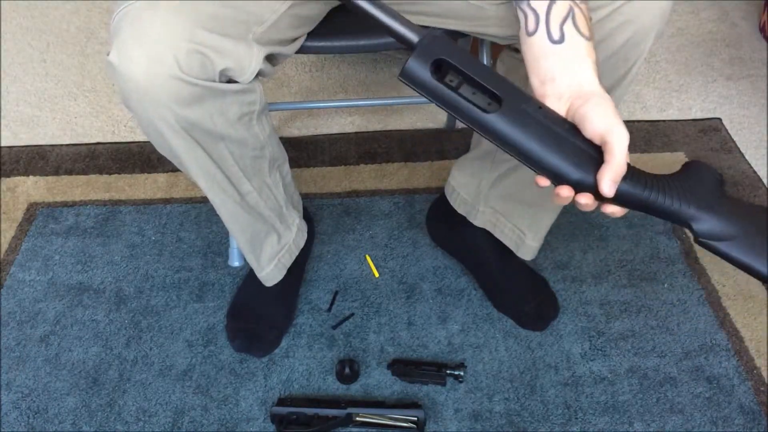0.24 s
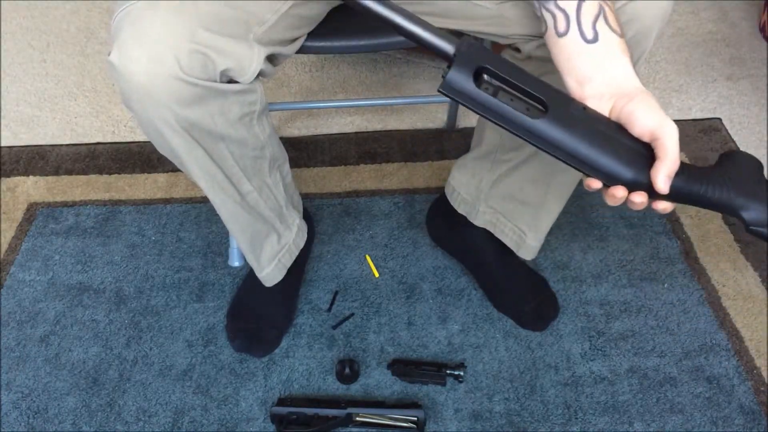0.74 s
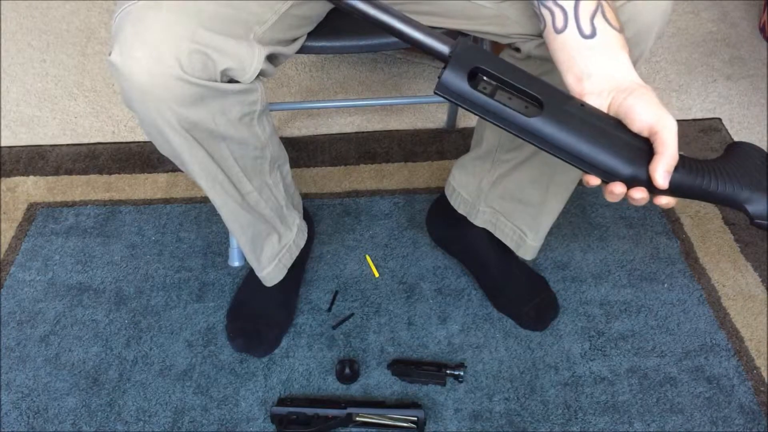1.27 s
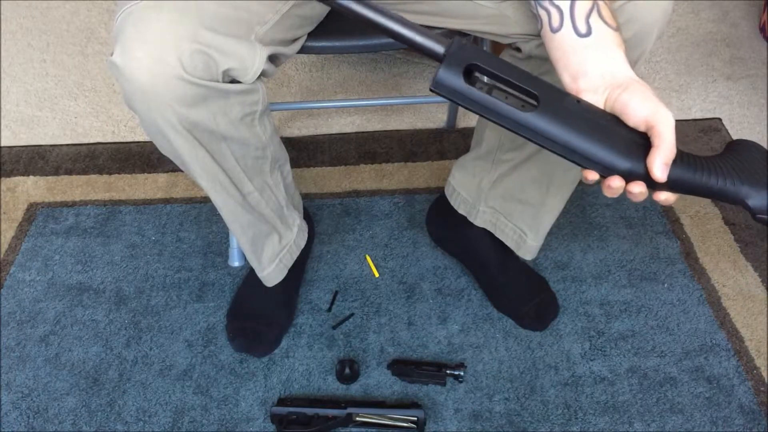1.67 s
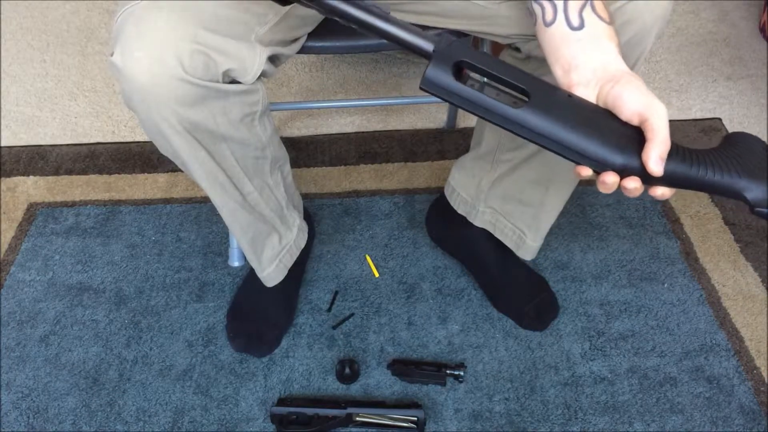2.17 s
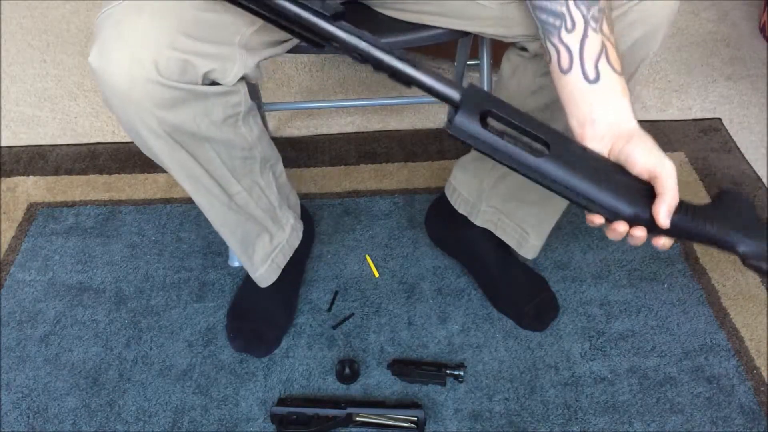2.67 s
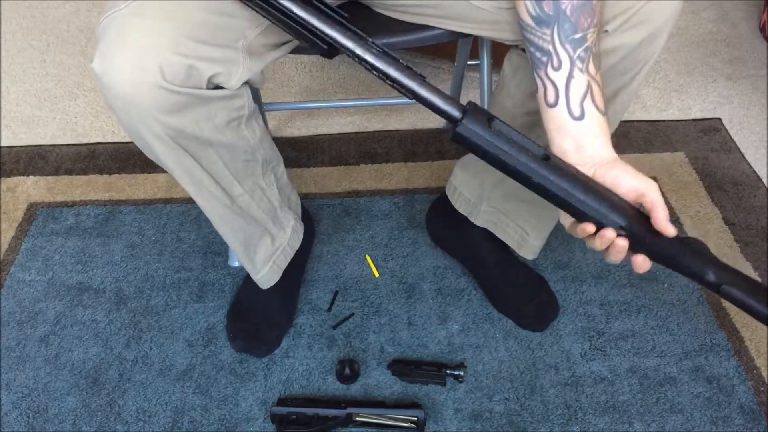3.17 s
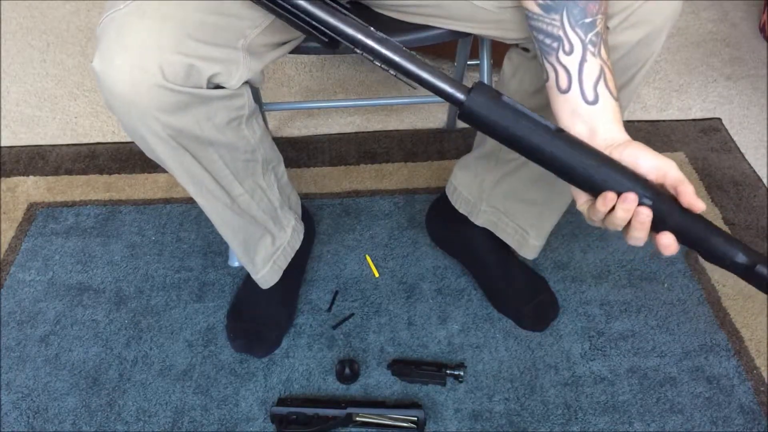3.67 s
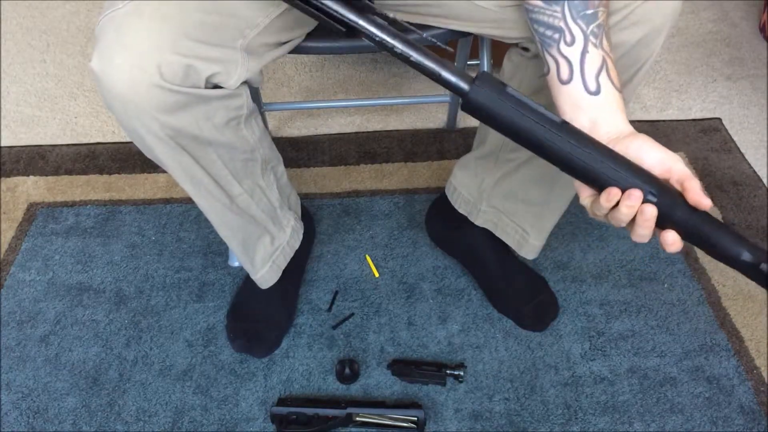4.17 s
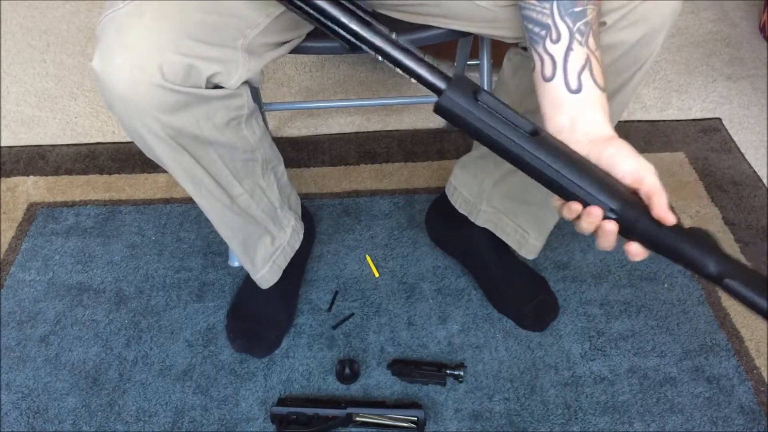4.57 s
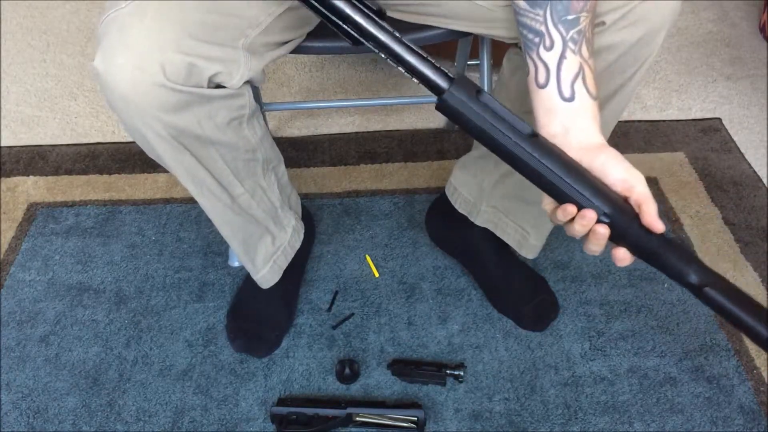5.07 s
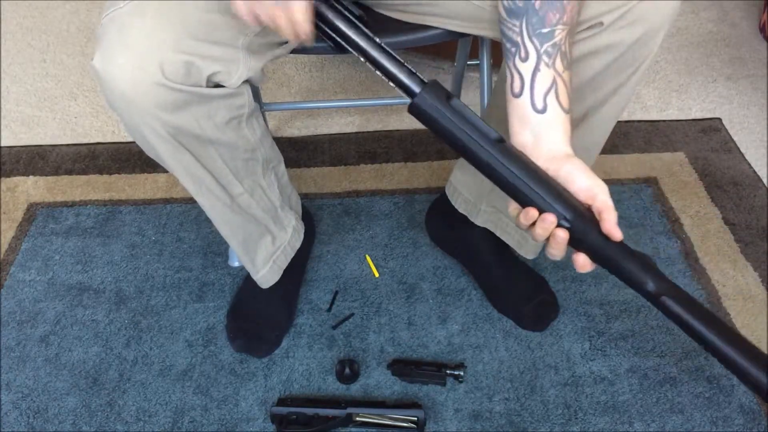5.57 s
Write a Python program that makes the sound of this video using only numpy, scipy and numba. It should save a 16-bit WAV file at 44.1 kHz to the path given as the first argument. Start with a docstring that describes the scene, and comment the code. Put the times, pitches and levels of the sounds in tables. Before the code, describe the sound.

Parts of a pump shotgun are slid together in the hands of a seated person, close to a phone microphone in a small carpeted room. From 0 to 0.45 s loose parts rub and tick, ending in a bright sharp clack. At 0.65-1.07 s a thin, ringing metal scrape comes with clicks, then a pause. From 1.6 to 2.15 s two rougher strokes grate with knocks and dull stock thuds. After another pause, a quick slide and cluster of clacks sounds at 2.55-2.8 s. Lighter ticks and faint rubs follow around 2.9, 3.3, 3.5 and 3.7 s. A soft slide at 3.9 s leads to a loud, hard clack at 4.2 s; another heavy double clack lands at 4.75 s, with rattles until 5 s. Smaller taps follow at 5.2-5.4 s, and a soft scrape with ticks at 5.65-5.8 s. Short room tail, quiet hiss and wavering low hum throughout.

```python
"""Steel scrapes, knocks and rattles: parts of a pump shotgun slid together in the hands of someone seated. Bars
scrape in their grooves as uneven noise bursts with two moving pitches; knocks are ticks with dying rattles and
short notes; this contact noise drives damped modes of barrel, receiver and stock. A small carpeted room answers
with a diffuse tail, over quiet hiss, wavering household hum and low rumbles of handling. The microphone is that
of a phone a step away."""
import sys
import numpy as np
from scipy import signal
from scipy.fft import rfft, irfft
from scipy.io import wavfile
from scipy.ndimage import uniform_filter1d
from numba import njit

SR = 44100
rng = np.random.default_rng(int(sys.argv[2]) if len(sys.argv) > 2 else 0)


def transcribe(u):
    """Save the signal u as a 16-bit wav file named by the first command-line argument.

    u: samples, shape (n,) or (channels, n), limited to [-1, 1]; the rate is SR.
    q: integer samples, one column per channel.
    """
    v = np.clip(np.atleast_2d(u).T, -1, 1)
    q = np.round(v * 32767).astype(np.int16)
    wavfile.write(sys.argv[1], SR, q)


def nominal_scale(level):
    """Amplitude ratio for a level in decibels (scalar or array-like)."""
    x = np.asarray(level, float) / 20
    return 10 ** x


N = 257098

# frequency ranges of thud, clack, ring and sizzle: (low edge [Hz], high edge [Hz])
CONTACT_BANDS = [(300, 850), (850, 2950), (2950, 9000), (9000, 16400)]
# hiss and rumble of house and microphone: (frequency [Hz], relative density [dB])
HOUSE_SPECTRUM = [(15, -37.5), (25, -17.5), (82, -4), (170, -16), (206, -11.5), (229, -7.5), (335, -15.5),
                  (560, -18), (734, -29), (818, -22), (1480, -24), (2220, -21), (2840, -25), (12900, -32.5),
                  (16000, -37)]
# narrow household hum: (centre [Hz], width [Hz], level at rest [dB])
HUM_BANDS = [(122, 17, -80.5), (175, 49, -80), (228.8, 28, -78.5)]
# low rumbles from handling the gun, swelling in the hum bands: (time [s], then added level at the peak for each
# hum band [dB])
HANDLING_RUMBLES = [(0.02, -81, -77.5, -61.5), (.53, -92, -75, -69.5), (.63, -84, -79, -72),
                    (1.67, -68.5, -59.5, -69.5), (2.0, -83, -57.5, -73), (2.18, -64, -79, -66), (2.29, -73, -75, -94),
                    (2.69, -85, -73, -75), (3.75, -79.5, -83, -63), (3.95, -85, -88.5, -64.5),
                    (4.2, -69.5, -73.5, -71.5), (4.77, -54.5, -59.5, -51.5), (5.45, -81, -70.5, -75),
                    (5.76, -82, -59, -62)]
# short strokes of the bars, each a straight fade: # (time [s], length [s], scrape at start [dB], fade to the
# end [dB], ring over scrape [dB])
SHORT_STROKES = [(0, 0.044, -31.5, -19.5, -1), (0.064, .07, -39.5, -11, 2.5), (0.183, .15, -43, -18, -3),
                 (0.333, .045, -39, -14, -7), (0.391, .04, -32, -15.5, -10.5), (2.774, .04, -46.5, -22, 1),
                 (2.853, 0.045, -51.5, -1.5, 5), (2.923, 0.037, -50.5, -21, 2.5),
                 (3.273, 0.1, -43, -21.5, 5.5), (3.368, 0.135, -60, 4, 0), (3.519, 0.05, -47.5, -33, -3),
                 (3.654, .12, -55.5, -14.5, 1), (4.247, .12, -42, -19, 0), (4.779, 0.021, -24, -17.5, 4),
                 (4.802, 0.062, -43.5, -1, -3.5), (4.875, 0.12, -45.5, -16, -6), (4.989, 0.058, -37, -15.5, 0),
                 (5.2, 0.036, -41, -26, -28), (5.27, 0.043, -38.5, -27, -3), (5.339, 0.053, -42, -26.5, -18)]
# long strokes of the bars in their grooves, one list each: (time [s], scrape [dB], ring over scrape [dB])
BAR_STROKES = [
    [(0.66, -38, 2), (0.744, -44.5, 3.5), (0.78, -34.5, 6), (0.786, -31, 0), (0.828, -46.5, 4),
     (0.856, -35, 3), (0.898, -40.5, 8), (1.05, -34.5, 2), (1.07, -42, 6)],
    [(1.63, -38, 7), (1.65, -44, -11), (1.66, -47, 1), (1.676, -45, -14), (1.686, -32, -8),
     (1.716, -35.5, -16), (1.724, -38, -5), (1.752, -47, -1), (1.79, -38.5, -6)],
    [(1.81, -31.5, 4), (1.84, -39, -7), (1.872, -30.5, 3.5), (1.95, -46.5, 12.5), (1.978, -35, 4),
     (2.024, -41.5, 3), (2.064, -32, -3), (2.084, -42, -3), (2.14, -39, -7)],
    [(2.51, -74, 2.5), (2.532, -44.5, 3.5), (2.556, -35, 0), (2.584, -38.5, 7), (2.592, -36, -6),
     (2.61, -34, 11), (2.67, -41.5, -2), (2.702, -53, -6), (2.74, -58, 1)],
    [(3.87, -69.5, -6), (3.904, -47, 8), (3.934, -46, 6.5), (4.02, -68.5, -6)],
    [(4.06, -64.5, 5), (4.13, -42, 6.5), (4.136, -37.5, 4), (4.15, -39, 4.5), (4.17, -29, 7.5),
     (4.196, -33, 1), (4.2, -25.5, -11.5)],
    [(4.62, -66, -4), (4.64, -58, -5.5), (4.658, -53, -7), (4.678, -58, -3), (4.684, -45.5, -15.5),
     (4.708, -38.5, 4), (4.735, -34.5, -6.5)],
    [(5.65, -73.5, 3.5), (5.662, -46.5, -7), (5.678, -38, -9.5), (5.69, -51, -9), (5.738, -35, 0.5),
     (5.83, -57.5, -11)],
]
# colour as the gun is turned and the bars travel:
# (time [s], rumble over scrape [dB], sizzle over ring [dB], groove cavity [Hz], singing of the bar [Hz])
GUN_TURNING = [(0, -34, -12, 1880, 5000), (.3, -16, -18, 1660, 5140), (.42, -25, -7, 2380, 5270),
               (.66, -43, -3, 2730, 6430), (.74, -35, -11, 1920, 6100), (.8, -19, -6, 2740, 5950),
               (.86, -50, -10, 2330, 6200), (.92, -48, -7.5, 2550, 4800), (1.06, -40, -1.5, 2950, 4670),
               (1.62, -7.5, -5, 2410, 5660), (1.701, -44, -21, 3190, 5200), (1.74, -20, -16, 1550, 4570),
               (1.86, -18, -9, 2190, 6230), (1.88, -17, -5.5, 1900, 6070), (1.99, -14, -10, 1940, 5600),
               (2.03, -24, -7, 2230, 5900), (2.14, -3, -17.5, 2270, 6600), (2.55, -48, -9.5, 2360, 5000),
               (2.63, -16, -5.5, 1800, 5900), (2.9, -23, -7.5, 2200, 5170), (3.3, -15, -9, 1950, 6300),
               (3.7, -15, -27, 2100, 4750), (3.93, -19.5, -4.5, 1750, 4940), (4.1, -4.5, -3, 2000, 5760),
               (4.159, -19.5, -10, 2200, 5970), (4.185, -14.5, -0.5, 2200, 6230),
               (4.21, -12.5, -4, 2200, 6190), (4.7, -24, -3, 2470, 6880), (4.8, -12, -2.5, 1850, 6400),
               (5.0, -15.5, -4.5, 1730, 6700), (5.249, -11, -11.5, 2250, 5500), (5.4, -14, -26, 2000, 4800),
               (5.68, -1, -21, 1900, 5050), (5.74, -15, -32, 2200, 4000), (5.83, -13, -22, 1960, 4000)]
# knocks of steel on steel:
# (time [s], clack before the mix [dB], ring over clack [dB], rattle 60 dB decay [ms], note of struck part [Hz])
STEEL_KNOCKS = [(0.0577, -29.5, -13, 24, 1790), (0.147, -14.5, -2.5, 32, 890), (0.2057, -26, -15, 29, 964),
                (0.24, -17, -16.5, 51, 3140), (0.3299, -26, 1.5, 45, 1770), (0.3892, -30.5, 1, 46, 2340),
                (0.4396, -8.5, 5, 37, 7080), (0.456, -12.5, 1, 82.7, 2002), (0.6472, -15, 3.5, 34, 6300),
                (0.746, -41.5, 22, 27, 6560), (0.7729, -20.5, 7.5, 69, 12800), (0.7844, -14, 5.5, 21, 2620),
                (1, -24, -4, 52, 2820), (1.6147, -17, 2.5, 77, 5980), (1.656, -18, 0.5, 53, 2490),
                (1.6824, -24.5, 6, 58, 2950), (1.7235, -16.5, -6.5, 21, 1630), (1.796, -15, 0.5, 49, 3600),
                (1.856, -25.5, 1, 40, 2370), (1.9038, -19, -12, 42, 2110), (2.1281, -34, 12, 55, 7700),
                (2.1515, -15, -4.5, 15, 2085), (2.556, -37, 18.5, 48.5, 4620), (2.5873, -19, -2, 36, 2280),
                (2.5963, -11, -5, 30, 4570), (2.6096, -16.5, 5, 13, 6860), (2.6195, -20, 10.5, 23, 1790),
                (2.659, -20.5, -11, 33, 1023), (2.7582, -27, 5, 52, 1980), (2.768, -23, 3, 33, 6780),
                (2.8429, -36, 2.5, 56, 3830), (2.9204, -45, 6, 93, 2200), (3.2726, -36, 3, 39.3, 1730),
                (3.2843, -23, 5.5, 71, 2360), (3.2916, -25.5, 6.5, 195, 1763),
                (3.487, -22.5, 5.5, 32, 2384), (3.5131, -35.5, 8, 39, 1930),
                (3.6572, -39.5, -14.5, 71, 1420), (3.7024, -33.5, -3.5, 73, 1728),
                (3.9062, -38, -2, 39, 1730), (4.1333, -20.5, 4.5, 35, 1530), (4.155, -17.5, 0, 17, 2260),
                (4.169, -19, 8.5, 32, 7370), (4.1855, -22, 12, 30, 12800), (4.2033, 2, -16, 18, 2320),
                (4.2331, -6.5, 7.5, 35, 12300), (4.2428, -13.5, -3.5, 34, 2060),
                (4.7085, -47, 16.5, 30, 2310), (4.7441, -3, -8.5, 21.3, 950), (4.7524, -11, 5, 89, 1197),
                (4.7616, -5, 2.5, 67, 2338), (4.7674, -21.5, 6.5, 28, 1210), (4.7847, -22, -0.5, 40, 3570),
                (4.8739, -14, -11.5, 20, 2200), (4.879, -13.5, 0.5, 23, 7650), (4.9876, -20, 9.5, 30, 7280),
                (5.2, -24, -30, 37, 2050), (5.242, -15.5, -3.5, 65, 2590), (5.2504, -12, 1, 44, 2360),
                (5.266, -21, -23, 42, 2220), (5.339, -19, -19, 23, 1274), (5.389, -25, -38.5, 14, 1210),
                (5.5703, -43.5, -25, 36, 1767), (5.661, -34, -15, 57, 2180), (5.674, -23.5, -17, 16, 2390),
                (5.686, -29.5, 2.5, 36, 3850), (5.707, -24.5, -4, 170, 4040), (5.7194, -35, -11, 13, 2080),
                (5.742, -23.5, -16, 59, 1770)]
# dull bumps of the stock against hands and parts: (time [s], level before the mix [dB], note [Hz])
STOCK_THUDS = [(.1453, -36.5, 480), (.19, -43.5, 380), (.4389, -39.5, 480), (.7837, -35, 460),
               (1.07, -51, 480), (1.478, -46, 635), (1.657, -44, 600), (1.7224, -23.5, 620),
               (1.874, -23.5, 600), (1.975, -20, 620), (2.1276, -19.5, 577), (2.1511, -20, 590),
               (2.349, -50, 700), (2.598, -40, 480), (2.659, -31, 500), (2.7597, -36, 500),
               (2.855, -38, 480), (3.0794, -48, 700), (3.1694, -39.5, 480), (3.2912, -33, 480),
               (3.487, -44, 500), (4.1, -39, 600), (4.1544, -39.5, 600), (4.2025, -10, 620),
               (4.2322, -23, 620), (4.285, -26, 620), (4.385, -36, 560), (4.4994, -41, 600),
               (4.6342, -38, 598), (4.6844, -25.5, 562), (4.7434, -12.5, 620), (4.7678, -17, 620),
               (4.875, -30, 600), (4.93, -29, 600), (5.034, -33, 560), (5.203, -28, 600),
               (5.2507, -26, 600), (5.34, -34.5, 600), (5.39, -35.5, 500), (5.68, -33, 450),
               (5.7404, -22, 450)]
# modes of barrel, receiver and stock, damped by the hands: (frequency [Hz], relative gain [dB], t60 [s])
STEEL_MODES = [(498, 3.5, 0.1), (629, 4, 0.033), (917, 2, 0.26), (1210, -3, 0.5), (1405, -1, 0.32),
               (1520, 7, 0.4), (1770, 5, 0.33), (1930, -0.5, 0.54), (1945, 9, 0.3), (2200, 5.5, 0.15),
               (2430, -2.5, 0.11), (2437, 1.5, 0.26), (2601, 5.5, 0.12), (2895, 0.5, 0.26), (3495, 7, 0.05),
               (4040, 3.5, 0.064), (4620, 2, .025), (5540, 0.5, 0.071), (5900, -0.5, 0.047),
               (6680, -0.5, 0.018), (7080, 2.5, 0.014), (7580, 4, 0.037), (9270, -0.5, 0.058),
               (10270, -8, .015), (12500, 9, 0.09), (13600, 8, 0.017), (15900, -0.5, 0.0033)]
# decay of the small furnished room: (frequency [Hz], t60 [s])
ROOM_DECAY = [(250, 0.24), (1400, 0.24), (3700, 0.33), (9700, 0.17), (15000, 0.12)]


def band(x, lo_hz, hi_hz):
    """Steep band-pass."""
    return signal.sosfilt(signal.butter(5, [lo_hz, hi_hz], "bandpass", fs=SR, output="sos"), x)


def unit(x):
    """Scale to rms 1."""
    return x / np.sqrt(np.mean(x ** 2))


def walk(rate):
    """Wandering curve of rms 1: random levels, rate of them a second, joined by slews."""
    hold = int(SR / rate)
    steps = np.repeat(rng.standard_normal(N // hold + 1), hold)
    return unit(uniform_filter1d(steps, hold)[:N])


def grit(sharp_db):
    """Asperities catching: dense clicks with a long-tailed spread of sizes."""
    return unit(rng.standard_normal(N) * nominal_scale(sharp_db * rng.exponential(size=N)))


def turning(s):
    """Rumble, sizzle, groove pitch and bar pitch at the given times, between the positions of the gun."""
    at, *columns = np.transpose(GUN_TURNING)
    return [np.interp(s, at, column) for column in columns]


def house_hiss():
    """Steady hiss and rumble of house and microphone: noise shaped to one spectrum."""
    level_db = -67.5  # rms
    hz, db = np.transpose(HOUSE_SPECTRUM)
    f = np.maximum(np.fft.rfftfreq(N, 1 / SR), 1)
    shape = nominal_scale(np.interp(np.log(f), np.log(hz), db))
    return nominal_scale(level_db) * unit(irfft(rfft(rng.standard_normal(N)) * shape, N))


def hum_and_handling():
    """Narrow bands of low noise: household hum whose levels waver slowly, and rumbles that swell as the gun is
    handled."""
    waver_db, rise_s, settle_s = 5.5, 0.09, 0.27  # rise and settling: times for 20 dB
    t = np.arange(N) / SR
    shapes = [nominal_scale(-20 * np.maximum((row[0] - t) / rise_s, (t - row[0]) / settle_s)) for row in HANDLING_RUMBLES]
    hum = 0
    for (centre, width, rest_db), peaks_db in zip(HUM_BANDS, np.transpose(HANDLING_RUMBLES)[1:]):
        level = nominal_scale(rest_db + waver_db * walk(3.6)) + nominal_scale(peaks_db) @ shapes
        noise = unit(band(rng.standard_normal(N), centre - width / 2, centre + width / 2))
        hum = hum + level * noise
    return hum


def strokes():
    """Envelope per band of the sliding contact, which catches and slips unevenly, and its two moving pitches."""
    touch_s = 0.006  # a contact closes and opens this fast
    t = np.arange(N) / SR
    scrape, ring_env = np.zeros(N), np.zeros(N)
    rubs = [[(s, db, ring_db), (s + length, db + fade_db, ring_db)]
            for s, length, db, fade_db, ring_db in SHORT_STROKES]
    for stroke in list(BAR_STROKES) + rubs:
        s, db, ring_db = np.transpose(stroke)
        a, b = max(int((s[0] - touch_s) * SR), 0), int((s[-1] + touch_s) * SR)
        now = t[a:b]
        touch = np.clip(np.minimum(now - s[0], s[-1] - now) / touch_s + 1, 0, 1)
        scrape[a:b] += touch * nominal_scale(np.interp(now, s, db))
        ring_env[a:b] += touch * nominal_scale(np.interp(now, s, db + ring_db))
    rumble_db, sizzle_db, groove_hz, bar_hz = turning(t)
    env = np.array([scrape * nominal_scale(rumble_db), scrape, ring_env, ring_env * nominal_scale(sizzle_db)])
    catch_and_slip = nominal_scale(3 * walk(120))
    return env * catch_and_slip, groove_hz, bar_hz


@njit
def sweep(x, hz, width):
    """State-variable band-pass whose centre moves."""
    y, b, l = np.empty(len(x)), 0., 0.
    for i in range(len(x)):
        g, k = np.tan(np.pi * hz[i] / SR), width / hz[i]
        v = (b + g * (x[i] - l)) / (1 + g * (g + k))
        b, l, y[i] = 2 * v - b, l + 2 * g * v, k * v
    return y


def knocks():
    """Per band, a sharp tick then a dying rattle, the thud lasting longest; the struck part adds a short note."""
    crest = 3.43  # peak over rms of a rattle
    bands, notes = np.zeros((4, N)), np.zeros(N)
    t = np.arange(SR // 8) / SR
    stretch = np.array([[1.6], [1.], [.8], [.7]])  # decay of each band over that of the clack
    tick = np.array([[0.], [.3], [.8], [1.2]]) * nominal_scale(-60 * t / 0.017)
    attack = np.minimum(t / 0.00024, 1)
    chatter = grit(1.5)
    flutter = nominal_scale(4 * walk(500))  # loose parts keep touching, so a note is never clean
    # each blow: time [s], level per band [dB], rattle decay [ms], note [Hz], note over rattle [dB]
    blows = []
    for s, db, ring_db, ms, hz in STEEL_KNOCKS:
        sizzle_db = turning(s)[1]
        # the -38 dB thud is what every knock passes on to the stock
        blows.append((s, db + np.array([-38, 0, ring_db, ring_db + sizzle_db]), ms, hz, -2.5))
    for s, db, hz in STOCK_THUDS:
        blows.append((s, db + np.array([-4, -9.5, -29.0, -46.0]), 41.8, hz, -4))
    for s, db, ms, note_hz, note_db in blows:
        i = int(s * SR)
        n = min(len(t), N - i)
        decay = nominal_scale(-60 * t / (stretch * ms / 1000))
        fall = ((tick + decay) * attack)[:, :n]
        rattle = fall * chatter[i:i + n]
        # energy set by the blow alone, not by the chance of the chatter
        rattle *= np.sqrt(np.sum(fall ** 2, 1) / np.sum(rattle ** 2, 1))[:, None]
        size = nominal_scale(db[:, None]) / crest
        bands[:, i:i + n] += size * rattle
        own = np.searchsorted([lo for lo, _ in CONTACT_BANDS[1:]], note_hz)  # band holding the note
        note_fall = fall[1] ** (0.29 + note_hz / 5000)  # high notes die faster
        tone = np.sin(2 * np.pi * note_hz * t[:n])
        notes[i:i + n] += nominal_scale(note_db) * size[own] * note_fall * flutter[i:i + n] * tone
    return bands, notes


def contact_noise(hit, slide, scrape):
    """Knocks and scraping noise, each limited to its own frequency band."""
    contact = 0
    for k, (lo_hz, hi_hz) in enumerate(CONTACT_BANDS):
        whole = np.sqrt(SR / 2 / (hi_hz - lo_hz))  # each band carries the full envelope level
        contact = contact + band(whole * (hit[k] + slide[k] * scrape), lo_hz, hi_hz)
    return contact


@njit
def ring(x, pole, feed, step):
    """Bank of damped modes, gain 1 at each peak; feed holds each mode's input gain every step samples."""
    y = np.zeros(len(x))
    for m in range(len(pole)):
        z = 0j
        for i in range(len(x)):
            z = z * pole[m] + x[i] * feed[m, i // step] + 1e-18
            y[i] += 2 * (1 - abs(pole[m])) * z.imag
    return y


def ringing_steel(contact):
    """Damped modes driven by the contact noise; shifting contact points feed each mode differently."""
    hz, db, t60 = np.transpose(STEEL_MODES)
    jumps = rng.standard_normal((len(hz), N // 256 + 1))
    shift = uniform_filter1d(jumps, size=12, axis=1) * np.sqrt(12)
    pole = np.exp(2j * np.pi * hz / SR - np.log(1000) / (t60 * SR))
    modes = ring(contact, pole, nominal_scale(db[:, None] + 3 * shift), 256)
    return modes * nominal_scale(4.0 * walk(70))  # loose parts and fingers keep touching the ringing steel


def gun():
    """Contact noise heard directly, through the steel, and through the moving groove and bar resonances."""
    slide, groove_hz, bar_hz = strokes()
    hit, notes = knocks()
    scrape = grit(1.8)
    contact = contact_noise(hit, slide, scrape)
    modes = ringing_steel(contact)
    # the air pocket changes size as the bar travels; the free length of the bar changes too
    groove = nominal_scale(14.5) * sweep(slide[1] * scrape, groove_hz, 190.0)
    bar = nominal_scale(3.5) * sweep(slide[2] * scrape, bar_hz, 250.0)
    return 0.37 * contact + nominal_scale(-9.5) * modes + groove + bar + band(notes, 490, 22000)


def room(x):
    """Diffuse tail: third-octave noises, each dying at its own rate, soft furnishings eating the top treble."""
    t = np.arange(SR // 2) / SR
    hz, t60 = np.transpose(ROOM_DECAY)
    tail = np.zeros(len(t))
    for f in 100 * 2 ** np.arange(0, 7.4, 1 / 3):
        noise = band(rng.standard_normal(len(t)), f / 2 ** (1 / 6), f * 2 ** (1 / 6))
        tail += noise * nominal_scale(-60 * t / np.interp(np.log(f), np.log(hz), t60))
    tail = tail * np.clip((t - .003) / 0.0091, 0, 1)  # first reflections arrive after a few ms
    tail = tail / np.sqrt(np.sum(tail ** 2))
    return nominal_scale(-12) * signal.fftconvolve(x, tail)[:N]


def scene():
    """The gun close by, its echo in the room and the household floor."""
    near = gun()
    return (near + room(near) + house_hiss() + hum_and_handling())[None]


def low_pass(x):
    """Removes everything above the highest recorded frequency."""
    return signal.sosfilt(signal.butter(12, 16510, fs=SR, output="sos"), x)


def record(dry):
    """The phone rounds the loudest peaks and shelves down the very top, by at least 24 dB."""
    rounded = np.tanh(0.9 * dry) / 0.91
    top_shelf = signal.ellip(7, .5, 24, 15300, fs=SR, output="sos")  # edge at 15300 Hz
    mix = signal.sosfilt(top_shelf, rounded)
    return low_pass(mix)


dry = scene()
out = record(dry)
transcribe(out)
```